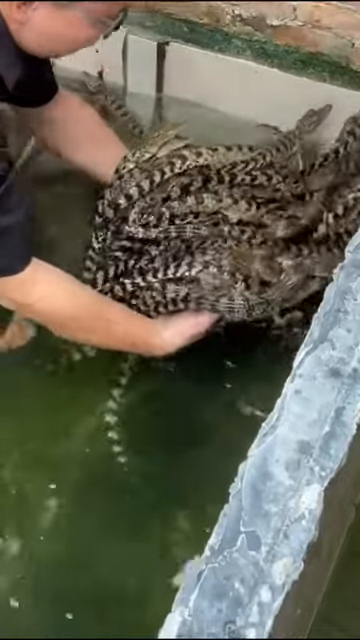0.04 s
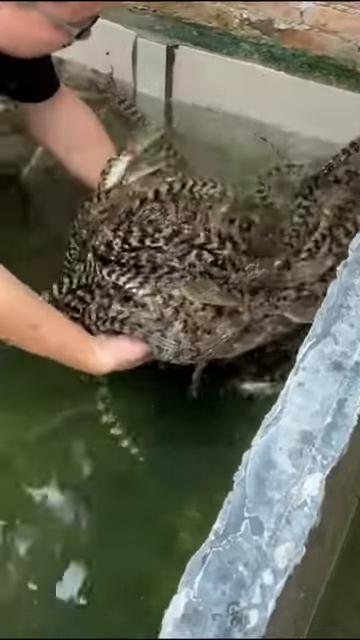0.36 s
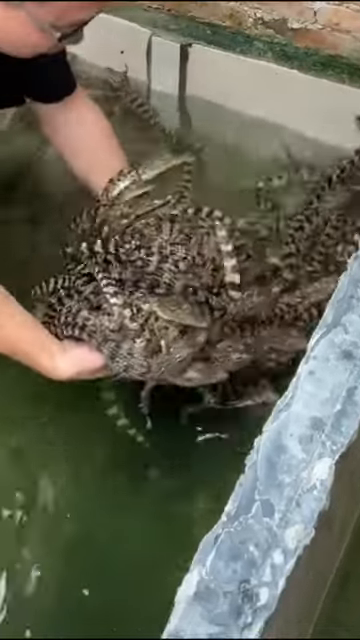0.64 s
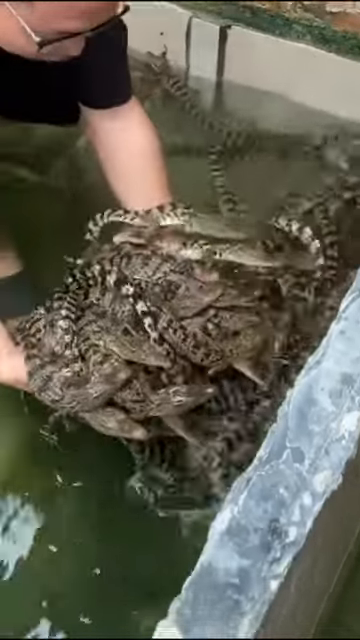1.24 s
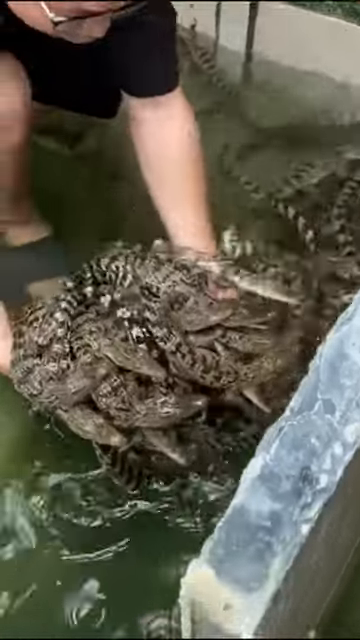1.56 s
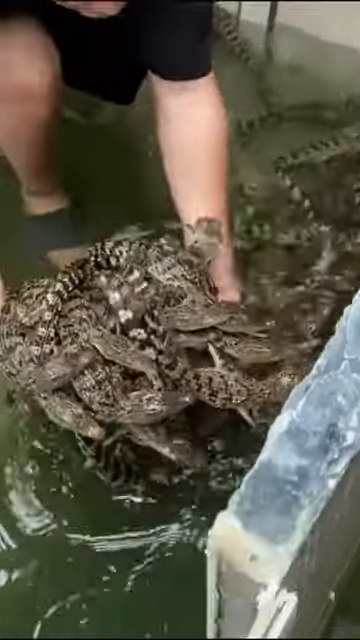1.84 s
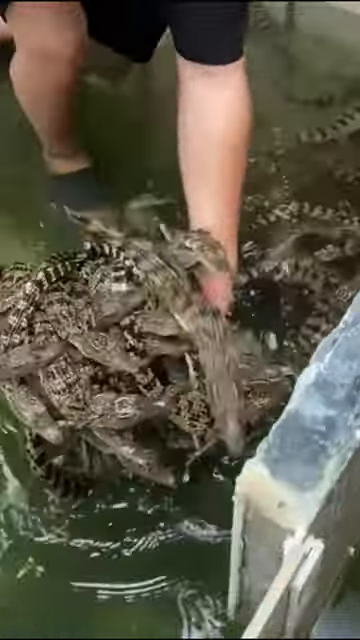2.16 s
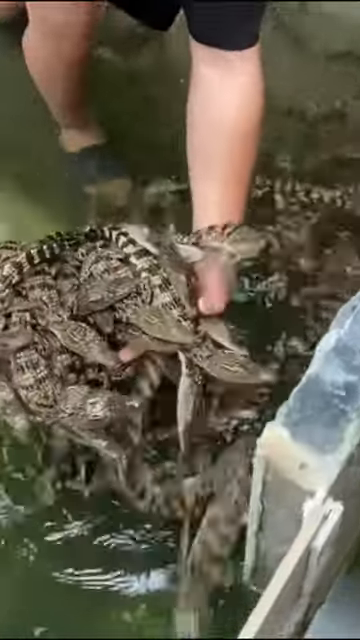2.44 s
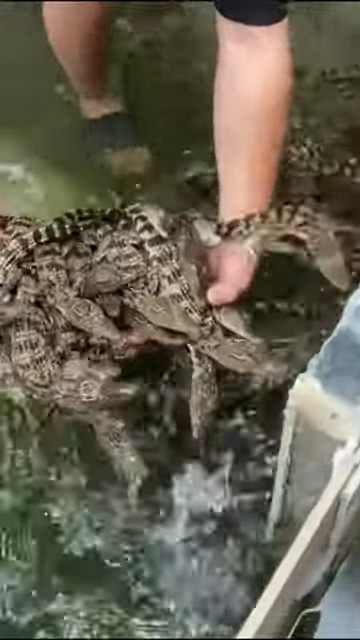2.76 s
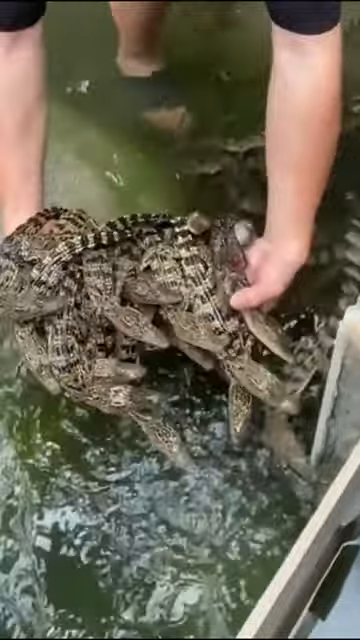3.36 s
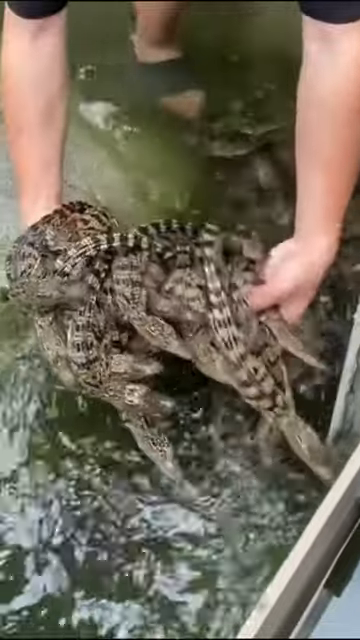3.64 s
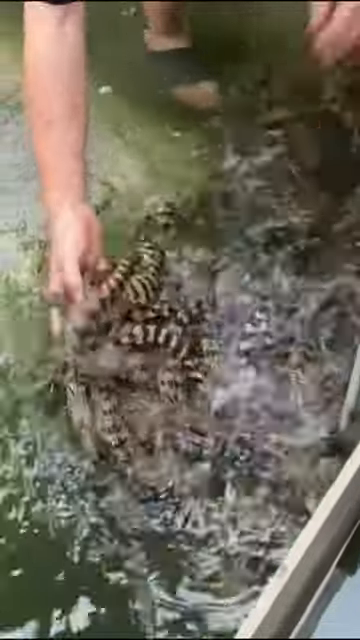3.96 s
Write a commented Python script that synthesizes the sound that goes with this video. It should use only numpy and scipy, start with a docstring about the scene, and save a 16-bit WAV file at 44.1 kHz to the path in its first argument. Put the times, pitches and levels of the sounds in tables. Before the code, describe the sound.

Young crocodiles yelp repeatedly in an echoing tank over sloshing water and a low hum.

```python
"""Young crocodiles in a water tank

An armful of young crocodiles is lifted in a shallow concrete tank. Each yelp arches in pitch,
then plunges through the throat's resonances (the pitches it boosts), flaring as its first and
then its second harmonic cross them. The walls echo. Water sloshes, and now and then splashes,
over a low, uneven hum."""
import sys
import numpy as np
from scipy import signal
from scipy.fft import rfft, irfft
from scipy.io import wavfile

SR = 44100
rng = np.random.default_rng(int(sys.argv[2]) if len(sys.argv) > 2 else 0)


def materialize(psi):
    """Save the field psi as 16-bit PCM at rate SR to the path in sys.argv[1].

    A 1-D psi becomes a single channel; in a 2-D psi each row is a channel.
    """
    bounded = np.clip(np.atleast_2d(psi).T, -1, 1)
    quanta = np.round(bounded * 32767).astype(np.int16)
    wavfile.write(sys.argv[1], SR, quanta)


N = 176400
T = np.arange(N) / SR

# Tone colour of the low rumble: f/Hz, relative level/dB
RUMBLE_SPECTRUM = [(24, -28.5), (40, 10), (50, -1.5), (70, 1.5), (110, -5.5), (220, -11.5), (400, -28),
                   (800, -37.5)]
# Wavering tones in the hum: f/Hz, width/Hz, level against the rumble/dB
HUM_TONES = [(60.5, 16.4, 0.5), (369.7, 41, -16.5)]
# Loudness of the hum over time: t/s, level/dB
HUM_LEVEL = [(0, -29), (1.3, -26), (1.7, -18), (2.2, -18.5), (2.85, -19.5), (3.3, -31.5), (4, -28)]
# Tone colour of sloshing water: f/Hz, relative level/dB
SLOSH_SPECTRUM = [(330, -1.5), (540, -11.5), (1250, -13.5), (1900, -24), (3200, -40.5), (5000, -48.5),
                  (6200, -38.5), (8200, -39.5), (10000, -59.5), (11900, -44), (13600, -61.5)]
# Loudness of the sloshing over time: t/s, level/dB
SLOSH_LEVEL = [(.7, -38), (1.5, -40.5), (2.0, -37.5), (2.7, -40.5), (3.2, -40), (4, -42.5)]
# Echoes off the water surface and the wall: delay/s, level/dB
TANK_ECHOES = [(.00285, -14.5), (.023, -16)]
# Pitches at which the tank rings briefly: f/Hz, width/Hz, level/dB
TANK_RINGS = [(700, 34, -9), (1030, 24, -19.5)]
# One row a splash: peak t/s, swell/s, decay/s, slap level/dB, spray level/dB
SPLASHES = [(1.244, 0.0075, 0.0096, -21, -47.5), (1.8, 0.0082, 0.0059, -73, -49.5),
            (2.324, 0.01, 0.0096, -49, -49)]
# Tone colour of a splash's slap: f/Hz, relative level/dB
SLAP_SPECTRUM = [(500, -24), (1400, 29), (1900, 23.5), (5000, -37.5)]
# Tone colour of its fine spray: f/Hz, relative level/dB
SPRAY_SPECTRUM = [(1500, -29), (3500, 6), (6200, 6.5), (9000, 4.5), (12000, 10), (13500, -6)]
# Head resonances for a typical throat: f/Hz, width/Hz, level added to a yelp's head level/dB
HEAD_RESONANCES = [(1490, 218, 9), (2140, 460, -11.5), (2570, 610, -13.5), (3560, 630, -14.5)]
# Tone colour of a yelp's hiss: f/Hz, relative level/dB
HISS_SPECTRUM = [(400, -2.5), (1500, -2), (2400, -2), (3800, -15), (5100, -25.5), (6000, -21),
                 (8300, -17.5), (10000, -36.5), (12000, -21), (13500, -46.5)]
# One row a yelp: t/s of top pitch, rise/s, top f/Hz, glide/s (halfway down), throat f/Hz,
# throat width/Hz, voice level/dB, chest level/dB and head level/dB (both against the throat),
# rasp (0 to 1), hiss level/dB
YELPS = [ (-.009, .024, 603, 0.055, 1005, 170, -8, -22, -33, 0.4, -38),
         (0.107, .03, 595.3, 0.071, 973, 190, -4, -20.5, -29, 0.15, -35.5),
         (0.325, .031, 955, 0.066, 1011, 180, -6, -20, -21.5, 0.31, -36.5),
         (.443, 0.016, 2334, 0.041, 837, 400, -7, -13, -14, 0.3, -34),
         (0.618, 0.039, 511, 0.064, 738, 245, -6.5, -13, -9, 0.13, -41),
         (.8226, 0.0024, 842, 0.061, 700, 188, -11, -11.5, -15, 0.48, -38),
         (0.954, 0.044, 1169, .049, 820, 456, -15, -15, -11.5, 1, -28.5),
         (1.1249, 0.039, 601.7, 0.068, 834, 410, -6.5, -15.5, -16.5, 0.48, -27),
         (1.345, 0.042, 635, .069, 865, 424, -10, -22.5, -22, 0.8, -24),
         (2.6758, 0.0031, 818, 0.057, 710, 191, -12.5, -8.5, -16, 0.93, -55.5),
         (2.8897, 0.0037, 1599, 0.056, 729, 253, -11.5, -11, -14.5, 0.93, -49),
         (3.127, 0.022, 1481, 0.061, 767, 300, -12, -8.5, -13, 1, -50),
         (3.28, 0.016, 1116, 0.055, 856, 432, -9, -17.5, -15.5, 0.27, -33),
         (3.445, 0.053, 449.6, 0.085, 729, 173, -6, -17.5, -18, 0.46, -43.5),
         (3.641, .037, 583.7, 0.058, 726, 191, -3.5, -15, -15, 0.16, -38.5),
         (3.8555, 0.0019, 821, 0.068, 700, 157.4, -8.5, -17, -22, 0.32, -41)]

BUBBLES_PER_S, BUBBLE_DB, BUBBLE_SHARPNESS, BUBBLE_CUT_HZ = 110, -38, 4.95, 700
TAIL_DB, TAIL_FADE_S, TAIL_BUILD_S, TAIL_CUT_HZ = -14, 0.27, 0.018, 5600
CHEST_HZ, CHEST_WIDTH_HZ, PEAK_STEEPNESS = 475.5, 221, 3.23
TYPICAL_THROAT_HZ, HEAD_FOLLOWS = 710, 0.7   # a smaller animal has a higher throat and head pitch
PITCH_FLOOR_HZ, GLIDE_POWER, FALL_S = 137, 1.63, 0.13   # a yelp ends FALL_S after its top
OCTAVE_RISE_S, RISE_DB_PER_OCTAVE = 0.043, 4   # the last octave up takes this long and grows louder
ATTACK_S, ATTACK_SHARE, RELEASE_S = 0.0055, 0.36, 0.051   # a long rise also fades in more gently
OVERTONE_DB, OVERTONE_DB_PER_OCTAVE, RASP_DB_PER_OCTAVE = -6, -29, 11.5   # rasp brightens the voice
WHISTLE_HZ = 1800   # above this pitch the voice thins to a whistle
PITCH_SHAKE, LEVEL_SHAKE, SHAKE_HZ = 0.0688, 0.87, 124   # how much and how fast full rasp trembles
RASP_NOISE_DB, RASP_LAG_S, RASP_SWELL_S = -10, 0.041, 0.032   # rough breath peaks during the plunge
HISS_LAG_S, HISS_SWELL_S = 0.011, 0.045   # the hiss peaks just after the top pitch
CUTOFF_HZ = 14300


def from_db(db):
    """Turn decibels into a number to multiply by."""
    return 10 ** (np.asarray(db) / 20)


def rms_one(x):
    """Scale a signal to an average strength (rms) of 1."""
    return x / np.sqrt(np.mean(x ** 2) + 1e-20)


def level_curve(rows):
    """Join (t/s, level/dB) points into a volume curve."""
    return from_db(np.interp(T, *np.transpose(rows)))


def swell(t, peak_s, width_s):
    """Grow to a brief peak, then die away."""
    return np.exp(-np.abs(t - peak_s) / width_s)


def low_pass(x, hz, order):
    """Turn down everything above hz; a higher order cuts more steeply."""
    return signal.sosfilt(signal.butter(order, hz, fs=SR, output="sos"), x)


def drift(hz):
    """Wander at random, about 1 either way, at rates up to hz."""
    return rms_one(low_pass(rng.standard_normal(N + SR), hz, order=2)[SR:])


def resonate(x, hz, width_hz):
    """Let a signal ring at one pitch; a narrower width rings longer."""
    r = np.exp(-np.pi * width_hz / SR)
    feedback = [1, -2 * r * np.cos(2 * np.pi * hz / SR), r * r]
    return signal.lfilter(np.array([1, 0, -1]) * (1 - r * r) / 2, feedback, x + 1e-18)


def coloured_noise(spectrum, ripple_db=0):
    """Noise with the given tone colour and, if asked, narrow random peaks and dips."""
    hz, db = np.transpose(spectrum)
    bins = np.arange(N // 2 + 1) * SR / N
    log_f, log_points = np.log(np.maximum(bins, 1)), np.log(hz)
    ripple_hz = np.arange(0, SR / 2, 130)
    ripple = ripple_db * np.interp(bins, ripple_hz, rng.standard_normal(len(ripple_hz)))
    past_ends = np.maximum(log_points[0] - log_f, 0) + np.maximum(log_f - log_points[-1], 0)
    gain = from_db(np.interp(log_f, log_points, db) + ripple) * np.exp(-2 * past_ends)
    return rms_one(irfft(rfft(rng.standard_normal(N)) * gain, N))


def hum():
    """A low, uneven rumble with two wavering tones."""
    tones = np.zeros(N)
    for hz, width, db in HUM_TONES:
        ringing = resonate(rng.standard_normal(N + SR), hz, width)
        tones += from_db(db) * rms_one(resonate(ringing, hz, width)[SR:])
    return level_curve(HUM_LEVEL) * rms_one(coloured_noise(RUMBLE_SPECTRUM) + tones)


def bubbles():
    """Bubbles ring briefly at random moments, the large low ones loudest."""
    pitches = np.geomspace(170, 1400, 22)
    strengths = from_db(3.7 * np.minimum(rng.exponential(1, N), 3)) * rng.choice([-1, 1], N)
    kicks = strengths * (rng.random(N) < BUBBLES_PER_S / SR)
    which_pitch = rng.integers(0, len(pitches), N)
    gurgle = sum(resonate(kicks * (which_pitch == k), hz, hz / BUBBLE_SHARPNESS) / hz ** 2.07
                 for k, hz in enumerate(pitches))
    return low_pass(gurgle, BUBBLE_CUT_HZ, order=4)


def sloshes(count):
    """Overlapping waves surge at random, each with its own hollow colour."""
    waves = (coloured_noise(SLOSH_SPECTRUM, ripple_db=5) * from_db(3.3 * drift(hz=15.5))
             for _ in range(count))
    return rms_one(sum(waves))


def water():
    """Stirred water: sloshing and gurgling grow and fade together."""
    stir = level_curve(SLOSH_LEVEL)
    gurgle = from_db(BUBBLE_DB) * rms_one(stir * bubbles())
    return stir * sloshes(count=3) + gurgle


def tank(x):
    """The tank adds two echoes, a brief ring and a short, dull tail of blurred echoes."""
    t = T[:SR]
    tail = low_pass(rng.standard_normal(SR), TAIL_CUT_HZ, order=1)
    tail *= from_db(-60 * t / TAIL_FADE_S) * (1 - np.exp(-(t / TAIL_BUILD_S) ** 2))
    tail *= from_db(TAIL_DB) / np.sqrt(np.sum(tail ** 2))
    echoes = sum(from_db(db) * np.interp(T - delay, T, x, left=0) for delay, db in TANK_ECHOES)
    rings = sum(from_db(db) * resonate(x, hz, width) for hz, width, db in TANK_RINGS)
    return x + echoes + rings + signal.fftconvolve(x, tail)[:N]


def splashes():
    """Thrashing tails slap the water: short bursts of noise with a fine spray."""
    slap, spray = coloured_noise(SLAP_SPECTRUM), coloured_noise(SPRAY_SPECTRUM)
    flicker = from_db(1.2 * drift(hz=250))
    out = np.zeros(N)
    for peak_s, swell_s, decay_s, slap_db, spray_db in SPLASHES:
        burst = np.exp(-np.maximum((peak_s - T) / swell_s, (T - peak_s) / decay_s))
        out += burst * (from_db(slap_db) * slap + from_db(spray_db) * spray)
    return flicker * out


def body_gain(hz, throat_hz, width_hz, chest_db, head_db):
    """How strongly one animal's throat, chest and head pass each frequency."""
    head_shift = (throat_hz / TYPICAL_THROAT_HZ) ** HEAD_FOLLOWS
    peaks = [(throat_hz, width_hz, 0), (CHEST_HZ, CHEST_WIDTH_HZ, chest_db)]
    peaks += [(f * head_shift, width, head_db + db) for f, width, db in HEAD_RESONANCES]
    gains = [from_db(db) / (1 + np.abs(2 * (hz - f) / width) ** PEAK_STEEPNESS)
             for f, width, db in peaks]
    return np.sqrt(sum(gain ** 2 for gain in gains))


def breath(animal):
    """Rushing air, coloured by the animal's resonances."""
    bins = np.arange(N // 2 + 1) * SR / N
    return rms_one(irfft(rfft(rng.standard_normal(N)) * body_gain(bins, *animal), N))


def voice(hz, phase, rasp, animal):
    """Twelve harmonics (whole multiples of the pitch), each flaring as it crosses a resonance."""
    k = np.arange(1, 13)[:, None]
    slope = OVERTONE_DB_PER_OCTAVE + RASP_DB_PER_OCTAVE * rasp
    overtones = from_db(OVERTONE_DB + slope * np.log2(k / 2)) / (1 + (hz / WHISTLE_HZ) ** 4)
    strengths = np.where(k == 1, 1, overtones) * body_gain(k * hz, *animal)
    return (strengths * np.sin(k * phase)).sum(axis=0)


def yelps():
    """Each raspy voice climbs and plunges in pitch; rough breath and a hiss swell with it."""
    out = np.zeros(N)
    pitch_shake, level_shake = PITCH_SHAKE * drift(SHAKE_HZ), LEVEL_SHAKE * drift(SHAKE_HZ)
    shared_hiss = coloured_noise(HISS_SPECTRUM, ripple_db=9.5)
    for top_s, rise, top_hz, glide, throat_hz, width_hz, db, chest_db, head_db, rasp, hiss_db in YELPS:
        animal = throat_hz, width_hz, chest_db, head_db
        span = (T > top_s - rise) & (T < top_s + FALL_S)
        t = T[span] - top_s   # zero at the top pitch

        octaves_to_climb = (np.minimum(t, 0) / OCTAVE_RISE_S) ** 2
        height = 1 / (1 + (np.maximum(t, 0) / glide) ** GLIDE_POWER)   # 1 at the top, 0 at the floor
        hz = PITCH_FLOOR_HZ * (top_hz / PITCH_FLOOR_HZ) ** height / 2 ** octaves_to_climb
        phase = 2 * np.pi * np.cumsum(hz * (1 + rasp * pitch_shake[span])) / SR
        tone = voice(hz, phase, rasp, animal) * (1 + rasp * level_shake[span])

        puffs = 1 + 0.5 * np.sin(phase)   # the noise pulses in step with the voice
        air = breath(animal)[span]
        rough = from_db(RASP_NOISE_DB) * rasp * swell(t, RASP_LAG_S, RASP_SWELL_S) * puffs * air
        hiss_noise = shared_hiss + 0.5 * coloured_noise(HISS_SPECTRUM, ripple_db=8)
        hiss = from_db(hiss_db) * swell(t, HISS_LAG_S, HISS_SWELL_S) * puffs * hiss_noise[span]

        fade_in = (t + rise) / (ATTACK_S + ATTACK_SHARE * rise)
        fade_out = (FALL_S - t) / RELEASE_S
        fade = np.sin(np.pi / 2 * np.clip(np.minimum(fade_in, fade_out), 0, 1)) ** 2
        loudness = fade * from_db(-RISE_DB_PER_OCTAVE * octaves_to_climb)
        out[span] += loudness * (from_db(db) * (tone + rough) + hiss)
    return out


def scene():
    """Yelps and splashes echo in the tank, over water and hum, in one channel."""
    return (tank(yelps() + splashes()) + water() + hum())[None]


def record(dry):
    """Cut off the highest treble steeply."""
    return signal.sosfilt(signal.cheby2(14, 60, CUTOFF_HZ, fs=SR, output="sos"), dry)


dry = scene()
out = record(dry)
materialize(out)
```